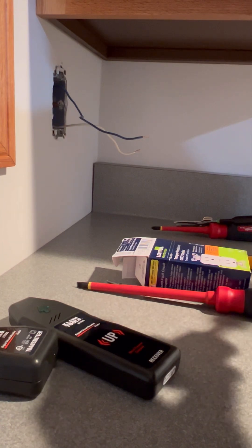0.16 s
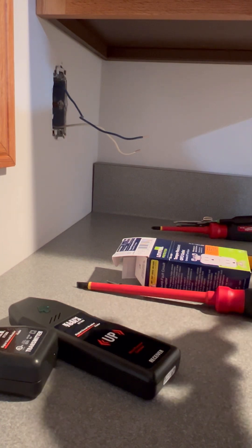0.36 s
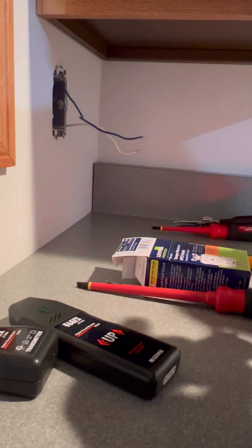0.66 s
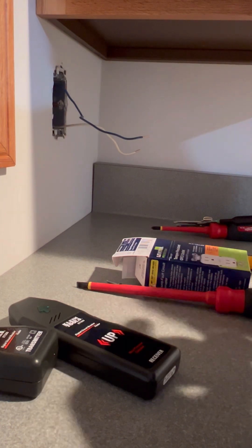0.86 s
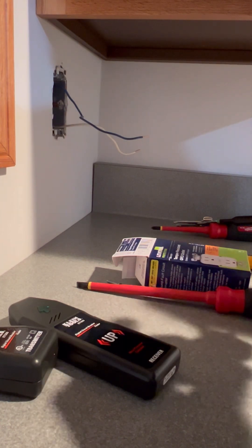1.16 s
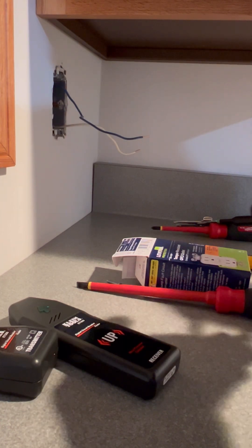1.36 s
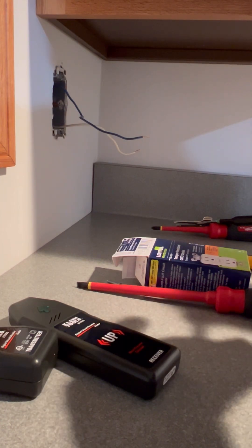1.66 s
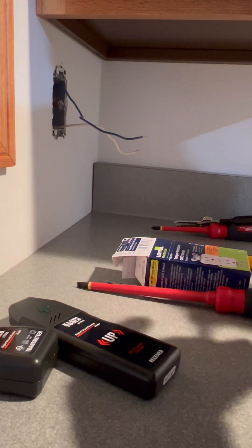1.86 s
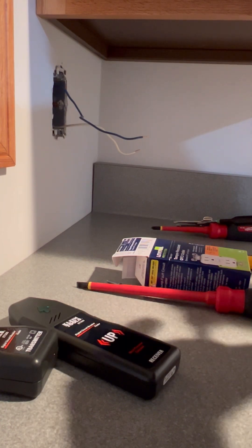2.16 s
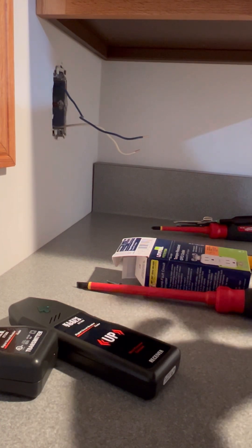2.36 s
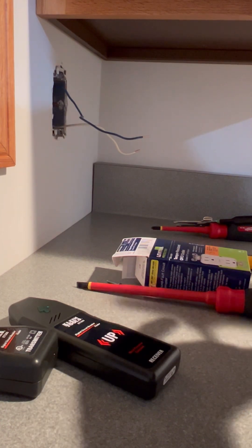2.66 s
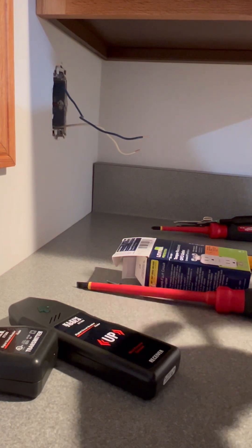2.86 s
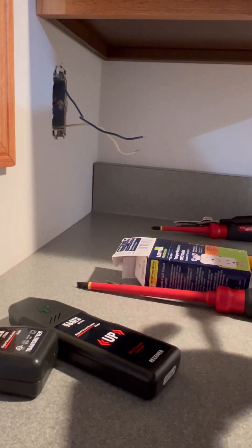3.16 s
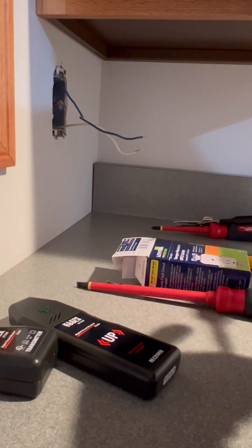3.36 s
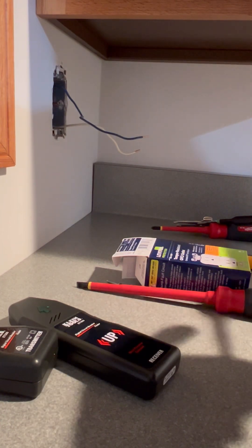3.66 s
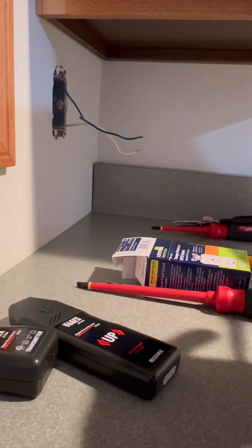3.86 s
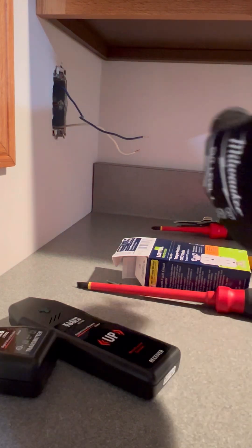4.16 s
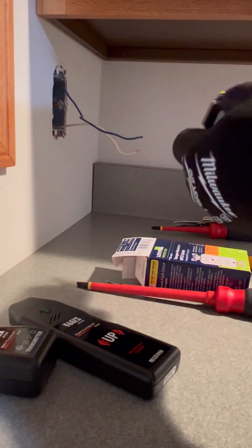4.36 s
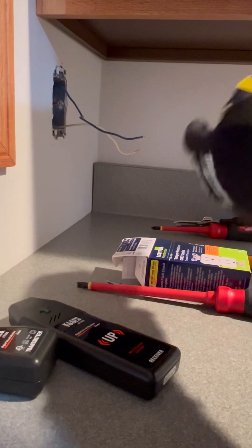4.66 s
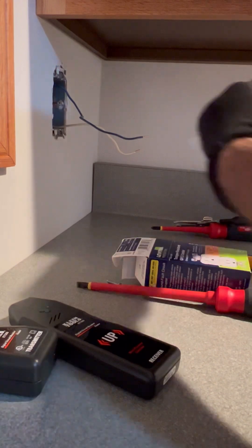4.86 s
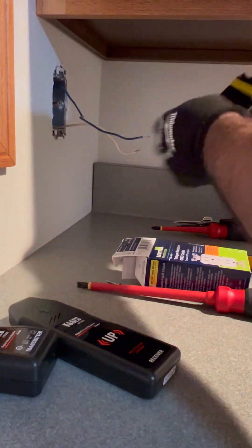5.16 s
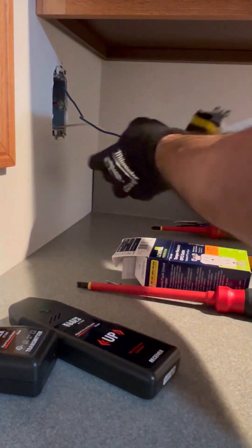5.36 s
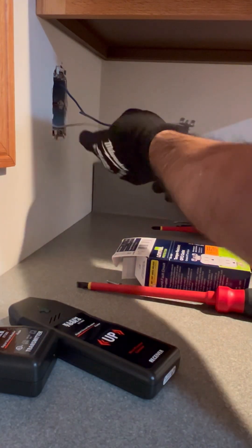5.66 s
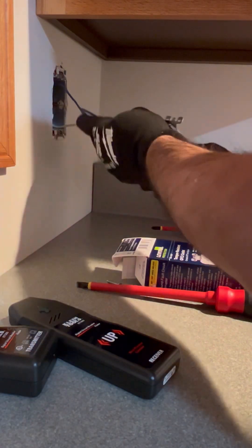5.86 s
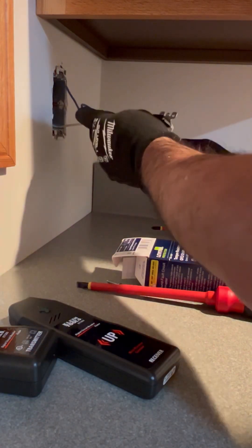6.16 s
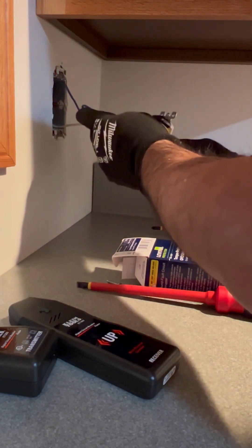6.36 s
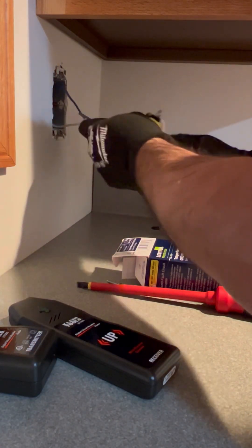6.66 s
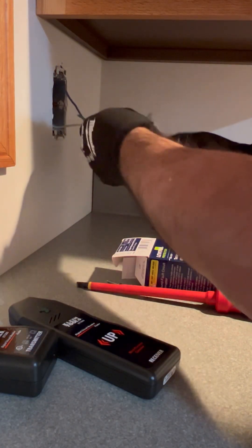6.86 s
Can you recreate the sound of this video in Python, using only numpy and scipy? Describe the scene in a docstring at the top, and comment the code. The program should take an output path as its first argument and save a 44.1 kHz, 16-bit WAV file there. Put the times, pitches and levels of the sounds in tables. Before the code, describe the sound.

In a quiet kitchen nook, gloved hands click and scrape small parts; a tool clatters hard on the counter, then soft shuffling and a tiny wire ping.

```python
"""Wiring an outlet over a counter

Close stereo pair in a kitchen nook under a wall cabinet: gloved hands click small parts (short noise bursts),
turn a terminal screw in short strokes and rustle (grains of stick-slip). Midway a tool is picked up: it knocks
and drags on the counter, whose resonances carry the blows to the pair; leaning shuffles on the counter.
Near the end a stiff wire pings (dying sines). Behind it all, an appliance hisses with a soft high tone
(filtered noise) and a low murmur flutters as it fades."""
import sys
import numpy as np
from scipy import signal
from scipy.fft import rfft, irfft
from scipy.io import wavfile
from scipy.ndimage import uniform_filter1d, minimum_filter1d

SR = 44100
rng = np.random.default_rng(int(sys.argv[2]) if len(sys.argv) > 2 else 0)


def int16_out(signal):
    """Quantize to a 16-bit WAV file."""
    q = np.round(np.clip(np.atleast_2d(signal).T, -1, 1) * 32767)
    wavfile.write(sys.argv[1], SR, q.astype(np.int16))


N = 308259
TIME = np.arange(N) / SR
BINS = abs(np.fft.fftfreq(16384, 1 / SR))  # f/Hz around the whole circle, fine enough for the counter

# Levels are relative within each source, which sets its own gain.
# small parts clicking in the hands: t/s, level/dB, hollow body level/dB, chatter decay/s
PART_CLICKS = [(0.057, -40, 1, 0.012), (0.102, -48, 4, .011), (0.4968, -43.5, 14, .007),
               (0.922, -31.5, 12.5, .0045), (0.9248, -28.5, 10.5, .008), (.953, -39.5, 22, .007),
               (0.9589, -18, 6, .0055), (.965, -19, -1.5, .012), (.973, -36, 18, 0.0035),
               (1.25, -49, -25, .013), (1.622, -41.5, -8, .013), (1.7515, -42, 8.5, .013),
               (1.819, -53, 10, .008), (1.912, -40, 1, .014), (1.986, -57.5, 21.5, .006),
               (2.249, -47, 12, .006), (2.444, -49, 12.5, .007), (2.5166, -33, 11, .015),
               (2.529, -34, 13, .012), (2.562, -40.5, -21, .014), (3.735, -49.5, -6.5, .01),
               (4.056, -49.5, -13.5, .004), (4.598, -47, -2.5, .005), (4.672, -45.5, -2.5, .003),
               (4.9319, -47, 5, .008), (4.9799, -49, 16, .005), (5.3491, -43, -16, .007),
               (5.3737, -43.5, -14, .006), (6.5, -43, -23.5, 0.014), (6.678, -49, -21, .005),
               (6.902, -45.5, -17, .005), (6.935, -47.5, -18, .004), (6.958, -51, -15, 0.0045)]
# spectrum of those clicks: f/Hz, level/dB
CLICK_SPECTRUM = [(30, -43), (90, -11), (200, -8), (360, -1), (520, -0.5), (780, -3.5), (1150, 4),
                  (1600, -0.5), (2400, 0.5), (3400, 3), (4800, 3), (6300, -7.5), (9000, -14.5),
                  (11000, -39.5)]
# pushes that turn the terminal screw: peak t/s, level/dB, rise/s, fall/s
SCREW_TURNS = [(2.815, -57.5, .12, 0.09), (2.858, -55.5, 0.049, 0.086), (3.105, -51, 0.11, 0.092),
               (3.375, -52, 0.1, 0.15), (3.618, -51, 0.059, 0.078), (3.66, -52.5, 0.089, 0.08),
               (3.878, -53.5, 0.068, 0.07)]
# spectrum of the turning screw: f/Hz, level/dB
SCREW_SPECTRUM = [(60, -17), (250, 0), (800, -5.5), (1100, -2.5), (2300, 3), (3300, -2.5), (4700, -6),
                  (6300, -18), (9000, -23), (10500, -62)]
# gloves scraping on plastic and wire: peak t/s, level/dB, rise/s, fall/s
GLOVE_RUBS = [(.034, -52.5, 0.042, 0.052), (.63, -67, 0.043, 0.12), (.845, -63, .05, 0.056),
              (.918, -45, .04, 0.011), (3.205, -57, 0.033, .06), (3.935, -58.5, 0.045, .025),
              (4.06, -60.5, 0.074, 0.054), (4.17, -66, 0.23, 0.15), (4.94, -54, 0.057, 0.042),
              (4.975, -54.5, 0.019, 0.086), (5.166, -57, 0.087, 0.052), (5.362, -53, .03, 0.073),
              (6.705, -57, .035, 0.071), (6.802, -60.5, .015, .03), (6.94, -56.5, 0.18, 0.38)]
# spectrum of the glove fabric: f/Hz, level/dB
GLOVE_SPECTRUM = [(60, -18.5), (250, -6.5), (900, -5), (2100, 5.5), (2900, 1), (3600, -1.5), (4400, 1),
                  (5400, -5), (6300, -15.5), (9000, -19), (10500, -42.5)]
# a stiff wire springing off its terminal: t/s, level/dB
WIRE_RELEASES = [(6.502, -46)]
# ringing modes of that wire: f/Hz, level/dB, t60/s
WIRE_MODES = [(2000, 1.5, 0.068), (2173, 10, 0.072), (2760, -3.5, 0.067), (3325, -4, 0.041),
              (4600, -28, 0.034)]

# blows on the counter: t/s, level/dB, boom level/dB, crack level/dB
COUNTER_KNOCKS = [(3.237, -58, 13.5, -2), (4.2494, -14.5, -17.5, 10), (4.262, -18.5, -0.5, 7),
                  (4.2928, -18, -9.5, 11), (4.402, -29.5, 1, -1), (4.4736, -3.5, -10, -3),
                  (4.489, -17, 3, -7.5), (4.498, -10.5, 4.5, -8.5), (4.53, -28.5, -1, -15.5),
                  (4.564, -13.5, 1.5, -9.5), (4.583, -14.5, 1.5, 4), (4.623, -9, -5.5, -2.5),
                  (4.6536, -10.5, 2.5, -3.5), (4.659, -12, -1, -14), (4.672, -18, 3, -4),
                  (4.694, -15.5, 2.5, -5), (4.711, -18.5, 3, -4), (4.738, -23.5, 10, -7),
                  (5.18, -54.5, 9.5, 5)]
# runs of weakening bounces: start t/s, length/s, gap/s, first level/dB, boom level/dB, crack level/dB, fade/(dB/s)
BOUNCE_RUNS = [(4.312, .04, .011, -22, -3.5, 10, 57), (4.762, .135, .032, -27.5, 17, -35.5, 132),
               (6.8264, .055, .022, -42, -6, -35, 370)]
# the tool sliding over the counter: peak t/s, level/dB, rise/s, fall/s
TOOL_DRAGS = [(4.315, -29.5, .09, .11), (4.405, -42.5, .06, 0.3), (4.562, -36.5, 0.094, .06),
              (4.672, -32, .17, 0.11)]
# resonances of the counter top and the things on it: f/Hz, width/Hz, height over the floor/dB
COUNTER_MODES = [(123.6, 7.5, 24), (198, 17, 15.5), (216, 19, 11), (271, 14, 11.5), (359, 28, 5.5),
                 (386, 29, 10.5), (437, 62, 4.5), (482, 30, 11.5), (632, 21, 11.5), (630, 25, 17),
                 (720, 16, 6.5), (839.6, 25, 6), (985, 43, 15), (1083, 24, 8.5), (1235, 130, 1.5),
                 (1376, 120, 0.5), (1573, 6.8, 4), (1890, 30, 2), (2073, 36, 10), (2250, 25, 3.5),
                 (2410, 110, 9.5), (4750, 350, 0.5)]
# spectrum of the counter beneath its resonances: f/Hz, level/dB
COUNTER_SPECTRUM = [(30, -43.5), (65, -25), (150, -18), (210, -2), (400, -0.5), (540, -5), (790, -11.5),
                    (1250, -5.5), (1700, -14), (2650, -18.5), (3150, -28), (4700, -32), (6200, -47),
                    (9000, -57), (11500, -83.5)]
# the arm and body shifting against the counter: peak t/s, level/dB, rise/s, fall/s
BODY_LEANS = [(5.0, -66, 0.064, 0.23), (5.285, -58, .4, 0.42), (5.6, -52.5, 0.18, 0.17),
              (5.76, -58, 0.083, 0.39), (6.66, -66.5, .4, 0.07), (6.84, -53.5, 0.034, 0.24)]
# spectrum of that shuffling: f/Hz, level/dB
LEAN_SPECTRUM = [(40, -36), (110, 0), (200, 1.5), (380, -7), (700, -20), (1500, -28), (4000, -52.5)]

# spectrum of the appliance's air noise: f/Hz, level/dB
AIR_SPECTRUM = [(25, -38.5), (50, -15.5), (90, 1), (125, 2), (220, -5), (430, -5.5), (610, .5), (860, -7.5),
                (1050, -1.5), (1400, -6), (2300, -5), (2850, -17.5), (5500, -27), (9000, -44)]
# how long the kitchen rings: f/Hz, t60/s
ROOM_DECAY = [(100, 0.65), (300, 0.41), (1000, 0.27), (4000, 0.24), (10000, 0.26)]
# the hands at the two microphones: f/Hz, side gain/dB, left over right/dB
HANDS_STEREO = [(97, -18.5, 2), (400, -12, -1), (1202, -3.5, -1), (2700, 1.5, 3.5), (4440, -2.5, 9),
                (8000, -1.5, 2.5)]
# the counter at the two microphones: f/Hz, side gain/dB, left over right/dB
COUNTER_STEREO = [(100, -19.5, 2), (300, -11.5, 0.5), (600, -3.5, -1), (1200, -3.5, 0), (2500, -1, 1.5),
                  (4600, -1, 5.5), (8000, -9.5, 4)]
# the appliance at the two microphones: f/Hz, side gain/dB, left over right/dB
AIR_STEREO = [(100, -17, 1), (296.8, -12.5, 1), (608.6, -6, 1.8), (1113, -5, 9), (1693, -6, 14),
              (2540, -4.5, 11), (5050, -1, 15), (9000, 0, 3.5)]

SCREW_DB, GLOVE_DB, DRAG_DB, LEAN_DB = 1, 1, 17, 0.5  # gains on the stroke tables
CATCHES_PER_S, CATCH_DB = 98, -9  # the fabric catches and lets go with a tick
UNEVEN_DB, UNEVEN_S = 1.76, 0.013  # finger pressure wavers: rms depth, and time per lump
STROKE_DROP_DB = 20  # how far a stroke has died away after its fall time
BOUNCE_JITTER = 0.13  # share of the gap
AIR_DB, TONE_HZ, TONE_WIDTH_HZ, TONE_DB = -62.5, 1682, 140, -64.5
THROB_HZ, THROB_RATE_HZ, THROB_DB, THROB_FADE_DB_PER_S = 218, 17, -67, 9.5  # level at t = 0
AIR_LAG_S, COUNTER_LAG_S = .00026, -0.000033  # how much later the left microphone hears it
EDGE_HZ = 11600  # upper band limit


def clicks():
    """Hard little contacts; a hollow plastic body adds its own low share to each."""
    out = np.zeros((2, N))
    for s, db, body_db, length in PART_CLICKS:
        contact = burst(TIME[:3000], length, direct=0.075)
        body = [(200, body_db / 2 + 3.5), (500, body_db), (2600, 0.0065)]
        add(out, s, amp(db) * colour(contact, body))
    return amp(23.5) * colour(out, CLICK_SPECTRUM)


def rubbing():
    """Stick-slip: the screw swishes softly and densely; glove fabric scrapes brighter, with ticks as it catches."""
    threads = grains(per_s=1500, spread_db=3.5, smooth=.7, length=.002)
    fabric = grains(per_s=700, spread_db=3.7, smooth=.6, length=.002)
    catches = grains(per_s=CATCHES_PER_S, spread_db=2, smooth=0, length=.003)
    screw = unit(colour(threads, SCREW_SPECTRUM)) * strokes(SCREW_TURNS)
    glove = unit(colour(fabric + amp(CATCH_DB) * catches, GLOVE_SPECTRUM)) * strokes(GLOVE_RUBS)
    return (amp(SCREW_DB) * screw + amp(GLOVE_DB) * glove) * pressure()


def pressure():
    """Gain of an uneven push, in short random lumps."""
    return amp(UNEVEN_DB * band(0, width_hz=1 / (2 * UNEVEN_S))[0])


def wire():
    """The released wire rings in a short ping, blurred by reflections in the nook."""
    out, t = np.zeros((2, N)), TIME[:8000]
    for s, db in WIRE_RELEASES:
        reflections = burst(t, length=0.0033, direct=0.85)
        ping = signal.fftconvolve(reflections, ring(WIRE_MODES, t)[None], axes=1)
        add(out, s, amp(db) * ping)
    return out


def counter():
    """Blows and the dragging between them all sound through the counter's resonances."""
    slips = grains(per_s=250, spread_db=3.5, smooth=0.31, length=0.0044)
    slips = colour(slips, [(300, 0.0), (1300, 1.5), (2600, -5.0), (6000, 1.5)])
    force = amp(DRAG_DB) * slips * strokes(TOOL_DRAGS)
    for s, db, boom_db, crack_db in COUNTER_KNOCKS + list(bounces()):
        add(force, s, amp(db) * blow(boom_db, crack_db))
    # resonance powers add to the floor of 1
    peaks = sum(amp(2 * db) / (1 + (2 * (BINS - hz) / width) ** 2) for hz, width, db in COUNTER_MODES)
    response_db = read(COUNTER_SPECTRUM, BINS) + 10 * np.log10(1 + peaks)
    return causal(bend(force, lag=0.0031), response_db)


def blow(boom_db, crack_db):
    """One clean push on the counter, and the chatter of the loose things on it."""
    push_spectrum = [(200, boom_db), (400, 4.5), (700, -6.0), (1250, -1.5),
                     (2700, crack_db - 5.0), (4500, crack_db - 11.0)]
    rattle_spectrum = [(200, -12.0), (450, -3.0), (1100, -2.0), (1800, crack_db / 2 + 2.5),
                       (2450, crack_db - 1.5), (3200, crack_db - 3), (4700, crack_db)]
    push = colour(burst(TIME[:3000], length=0.0059, direct=2.7), push_spectrum)
    rattle = colour(burst(TIME[:3000], length=0.01, direct=.1), rattle_spectrum)
    return amp(30.5) * push + amp(34.0) * rattle


def bounces():
    """A rocking object taps the counter at nearly even gaps, ever more weakly."""
    for start, length, gap, db, boom_db, crack_db, fade in BOUNCE_RUNS:
        gaps = gap * (1 + BOUNCE_JITTER * rng.uniform(-1, 1, size=12))
        for t in np.cumsum(np.r_[0, gaps]):
            if t < length:
                yield start + t, db - fade * t, boom_db, crack_db


def bend(x, lag):
    """Bending waves travel as the root of frequency: the crack leads, and 400 Hz comes `lag` s after 3 kHz."""
    hz = np.fft.rfftfreq(N, 1 / SR)
    slowness = np.sqrt(3000 / np.clip(hz, 100, 3000)) - 1
    delay = lag * slowness / np.interp(400, hz, slowness)
    phase = 2 * np.pi * np.cumsum(delay) * hz[1]  # group delay summed over frequency
    return irfft(rfft(x) * np.exp(-1j * phase), N)


def leaning():
    """Dull noise swells: shuffling as the arm reaches for the wall box."""
    shuffle = unit(colour(rng.standard_normal((2, N)), LEAN_SPECTRUM))
    return shuffle * strokes(BODY_LEANS) * amp(LEAN_DB)


def appliance():
    """Steady air noise with one fuzzy high resonance."""
    air = unit(colour(rng.standard_normal((2, N)), AIR_SPECTRUM))
    return amp(AIR_DB) * air + amp(TONE_DB) * band(TONE_HZ, TONE_WIDTH_HZ)


def throb():
    """A narrow low murmur that flutters many times a second and slowly dies away."""
    beat = (1 + np.cos(2 * np.pi * THROB_RATE_HZ * (TIME - .012))) ** 2
    murmur = unit(beat * band(THROB_HZ, width_hz=48)[0])
    return murmur * amp(THROB_DB - THROB_FADE_DB_PER_S * TIME)


def room(x, wet_db):
    """Adds the kitchen's tail: noise, each band dying at its own speed."""
    hz, t, z = signal.stft(rng.standard_normal((2, SR)), SR, nperseg=256)
    decay = amp(-60 * t / read(ROOM_DECAY, hz)[:, None])
    tail = signal.istft(z * decay, SR, nperseg=256)[1]
    tail *= 1 - np.exp(-TIME[:tail.shape[1]] / 0.0051)  # reflections build up over milliseconds
    tail /= np.linalg.norm(tail[0])
    return x + amp(wet_db) * signal.fftconvolve(x, tail, axes=1)[:, :N]


def ports(x, table, lag_s=0):
    """Two close microphones hear nearly the same bass; a wall on the left throws treble to that side."""
    hz, side_db, left_db = np.transpose(table)
    bins = np.fft.rfftfreq(N, 1 / SR)
    mid = rfft(x.mean(0))
    side = rfft(x[0] - x[1]) / 2 * amp(read(np.c_[hz, side_db], bins))
    # half the level difference and half the lag go to each microphone
    lean = amp(read(np.c_[hz, left_db], bins) / 2) * np.exp(-1j * np.pi * bins * lag_s)
    return irfft([(mid + side) * lean, (mid - side) / lean], N)


def strokes(rows):
    """Gain over time: each stroke gathers speed from rest, peaks and dies away; powers add."""
    power = np.zeros(N)
    for s, db, rise, fall in rows:
        attack = np.clip(1 + (TIME - s) / max(rise, .005), 0, 1) ** 2
        release_db = STROKE_DROP_DB * np.maximum(TIME - s, 0) / max(fall, .005)
        power += (attack * amp(db - release_db)) ** 2
    return np.sqrt(power)


def grains(per_s, spread_db, smooth, length):
    """Stick-slip: tiny snaps of uneven size over a smooth hiss."""
    sizes = amp(spread_db * np.minimum(rng.exponential(1, N), 3.5)) * rng.choice([-1, 1], N)
    slips = sizes * (rng.random(N) < per_s / SR)
    snaps = signal.oaconvolve(slips[None], burst(TIME[:1024], length, 0.81), axes=1)[:, :N]
    return unit(snaps) + smooth * rng.standard_normal((2, N))


def burst(t, length, direct):
    """A contact and its crowd of near reflections, with energy about 1."""
    scatter = rng.standard_normal((2, len(t))) * np.exp(-t / length)
    scatter /= np.linalg.norm(scatter, axis=1, keepdims=True)
    scatter[:, 0] += direct
    return scatter / np.hypot(1, direct)


def ring(modes, t):
    """Dying sines of a struck object."""
    return sum(amp(db - 60 * t / t60) * np.sin(2 * np.pi * hz * t) for hz, db, t60 in modes)


def band(hz, width_hz):
    """Two channels of noise in one resonance, at half amplitude width_hz from its centre."""
    bins = np.fft.rfftfreq(N, 1 / SR)
    resonance = 1 / (1 + ((bins - hz) / width_hz) ** 2)
    return unit(irfft(rfft(rng.standard_normal((2, N))) * resonance, N))


def colour(x, points, size=4096):
    """Filters by a table of (f/Hz, level/dB)."""
    return causal(x, read(points, abs(np.fft.fftfreq(size, 1 / SR))))


def causal(x, db):
    """Minimum-phase filter from a gain in dB over the whole frequency circle."""
    spectrum = np.exp(np.conj(signal.hilbert(np.log(amp(db)))))
    taps = np.fft.ifft(spectrum).real[:len(db) // 2]
    return signal.oaconvolve(x, taps[None], axes=1)[:, :x.shape[1]]


def read(points, hz):
    """Reads a table on a log-frequency axis."""
    f, value = np.transpose(points)
    return np.interp(np.log(hz + 1), np.log(f + 1), value)


def add(mix, s, sound):
    """Mixes a sound in at s seconds."""
    part = mix[:, round(s * SR):][:, :sound.shape[-1]]
    part += sound[..., :part.shape[1]]


def amp(db):
    """Decibels to gain."""
    return 10 ** (np.asarray(db) / 20)


def unit(x):
    """Scales to rms 1."""
    return x / np.sqrt(np.mean(x ** 2) + 1e-20)


def scene():
    """The hands work a little way off; the counter is right under the microphones."""
    hands = room(clicks() + rubbing() + wire(), wet_db=-12)
    worktop = room(counter(), wet_db=-12) + leaning()
    near = ports(hands, HANDS_STEREO) + ports(worktop, COUNTER_STEREO, COUNTER_LAG_S)
    background = ports(appliance(), AIR_STEREO, AIR_LAG_S) + throb()
    return near + background


def record(dry):
    """A fast limiter holds the hardest blow under full scale; then the band limit."""
    needed = np.minimum(1, .95 / (abs(dry).max(0) + 1e-9))
    gain = uniform_filter1d(minimum_filter1d(needed, size=301), size=301)
    lowpass = signal.firwin(511, EDGE_HZ, window=("kaiser", 9), fs=SR)
    return signal.oaconvolve(dry * gain, lowpass[None], "same", axes=1)


dry = scene()
out = record(dry)
int16_out(out)
```